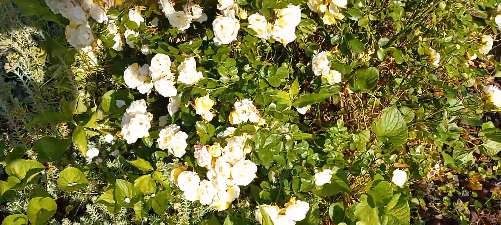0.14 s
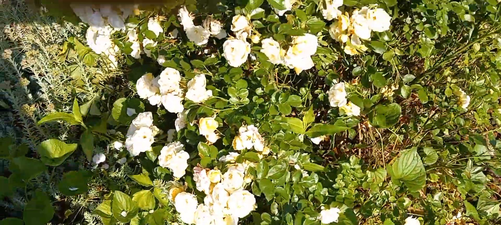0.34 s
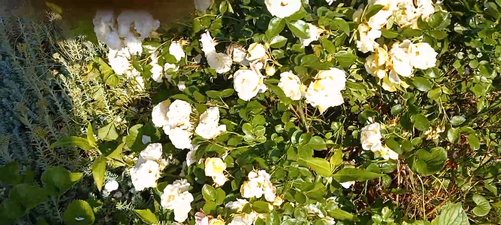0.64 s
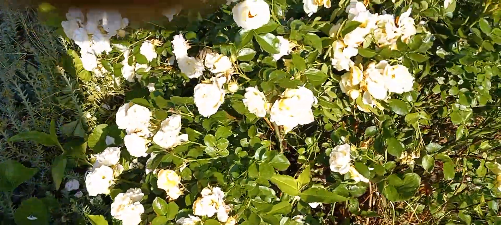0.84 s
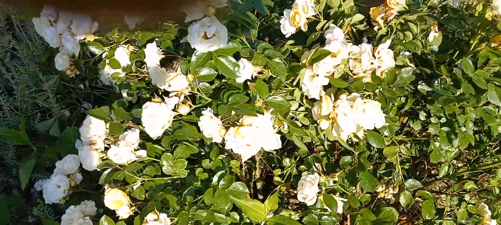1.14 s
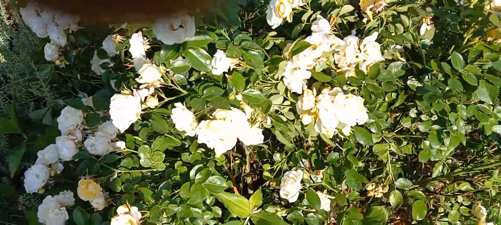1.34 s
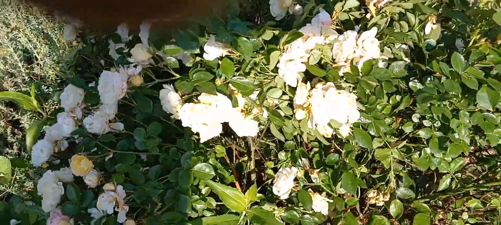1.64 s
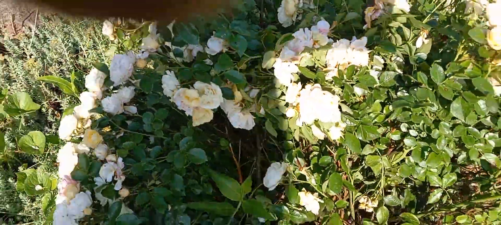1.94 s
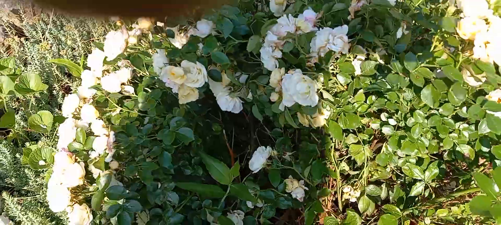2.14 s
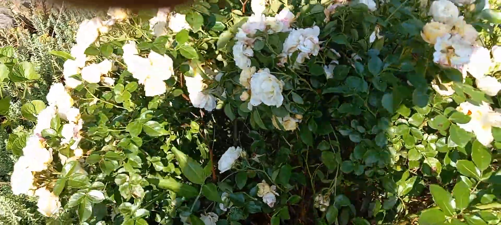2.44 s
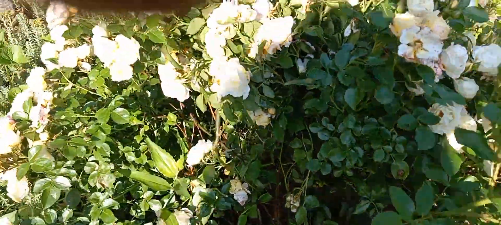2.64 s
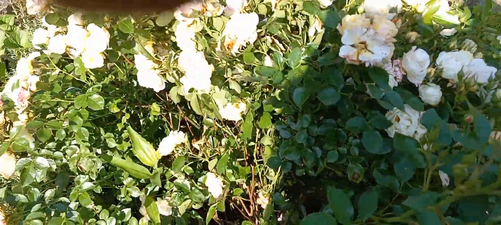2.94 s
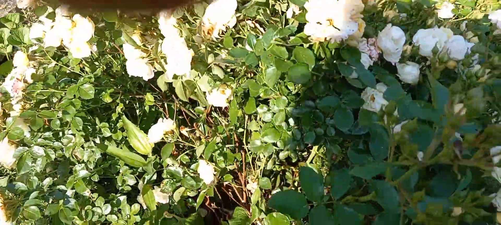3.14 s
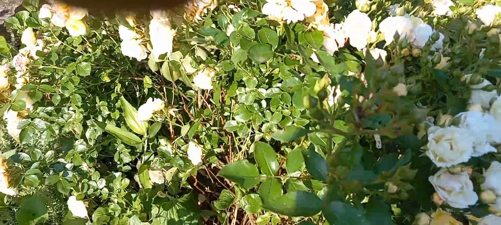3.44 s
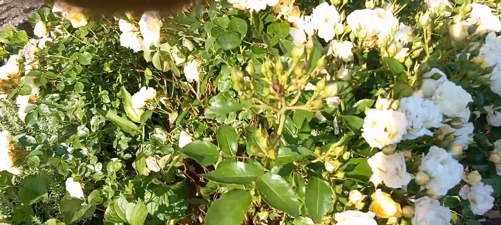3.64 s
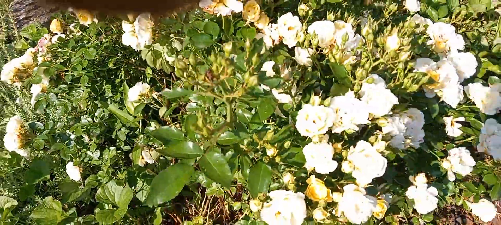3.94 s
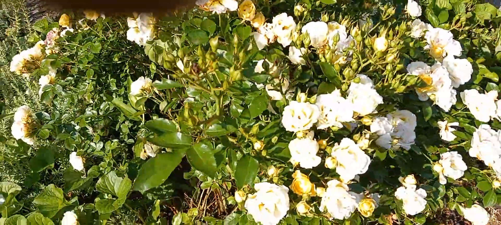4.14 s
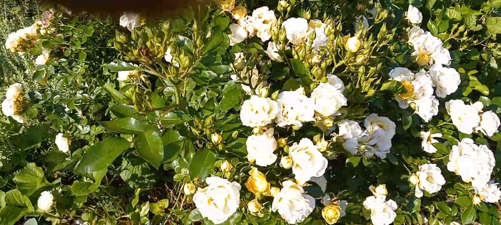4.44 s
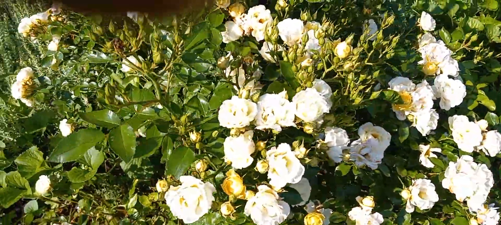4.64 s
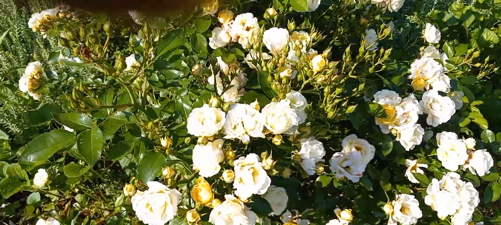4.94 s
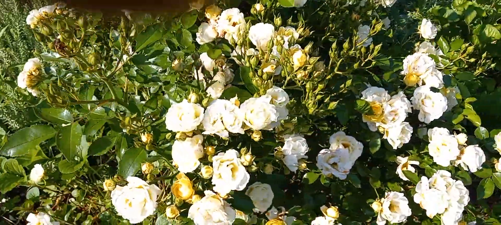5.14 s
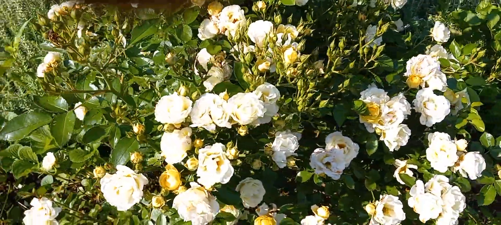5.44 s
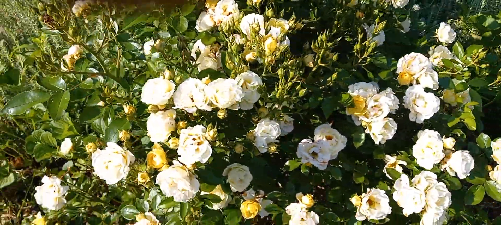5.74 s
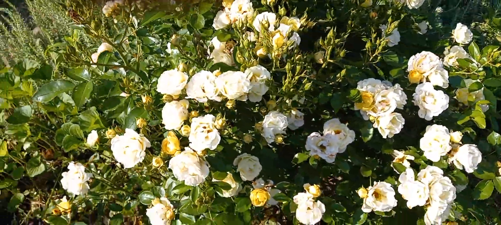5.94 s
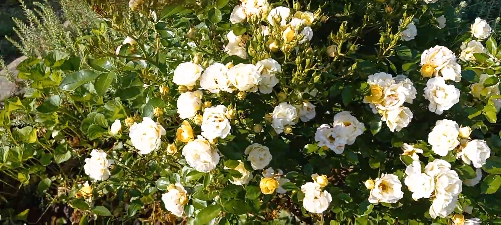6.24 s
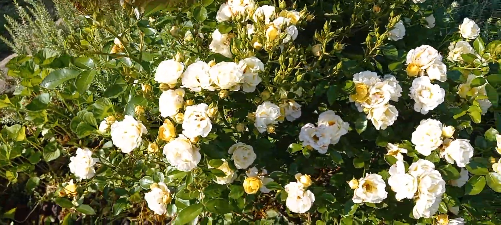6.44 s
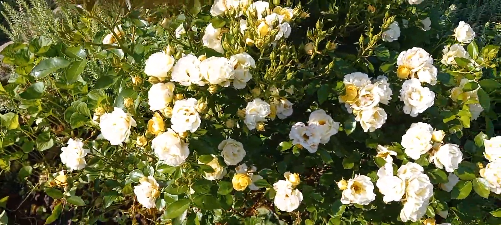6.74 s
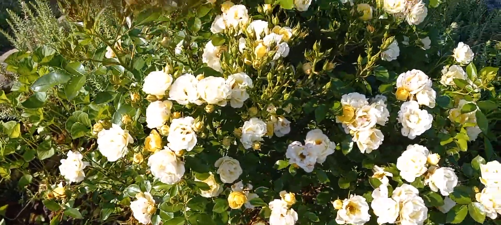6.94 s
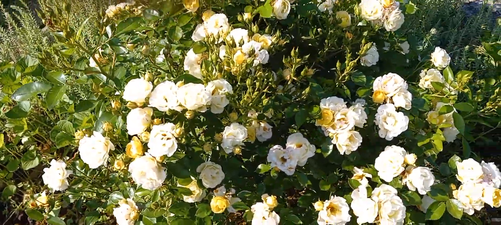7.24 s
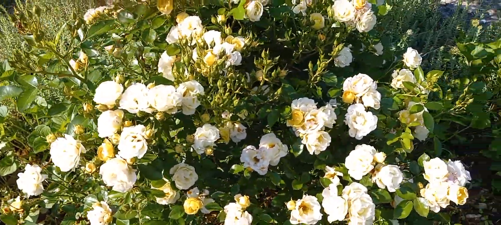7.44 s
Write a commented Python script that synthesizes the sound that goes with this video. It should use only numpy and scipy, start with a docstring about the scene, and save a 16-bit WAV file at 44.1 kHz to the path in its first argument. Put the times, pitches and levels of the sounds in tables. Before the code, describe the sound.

A quiet outdoor garden in stereo, with soft airy hush and a faint far machine, humming low with a light whirr, its direction shifting as the microphone turns. At once a bird whistles short pure notes near 2.2 and 2.5 kHz, low then rising high, twice by 0.6 s, with quick echoes off walls and leaves. Wind flutters low at the left, and foliage rustles crisply around 0.3 s. After a calmer gap, the phrase returns from 2.1 to 2.9 s, starting on the high note, amid rustles and wind puffs. Sharp twig ticks snap around 3.3 s. The heaviest wind thumps hit the left at about 4.5 s. The third phrase, clearer, runs from 4.9 to 5.65 s, with ticks and a snap near 5.36 s. Then mostly hum, hush, light wind and sparse rustle; handling clicks and a tiny high squeak come at 7.4 s.

```python
"""A garden, where a songbird whistles a phrase on two pitches, three times, with echoes off the walls nearby.
The whistles are gliding sine tones. Light wind, made of low noise, buffets each microphone port on its own.
A far machine hums and whirs, and swings round as the microphone turns: its delay between the ports changes.
Leaves and clothing rustle close by (showers of tiny clicks), twigs tick (bursts of dying noise),
a soft hush of filtered noise fills the air, and near the end there is a short squeak."""
import sys
import numpy as np
from scipy import signal
from scipy.fft import rfft, irfft, next_fast_len
from scipy.io import wavfile

SR = 44100
rng = np.random.default_rng(int(sys.argv[2]) if len(sys.argv) > 2 else 0)


def nominal_scale(level):
    """Amplitude ratio for a level in decibels (scalar or array-like)."""
    x = np.asarray(level, float) / 20
    return 10 ** x


def inscribe(sig):
    """Save sig as 16-bit PCM at rate SR to the path in sys.argv[1].

    A 1-D sig is mono; a 2-D sig holds one channel per row.
    Samples are clipped to [-1, 1] before scaling.
    """
    pcm = np.round(np.clip(np.atleast_2d(sig).T, -1, 1) * 32767)
    wavfile.write(sys.argv[1], SR, pcm.astype(np.int16))


N = 334719


def rms_one(x):
    """Scale to unit rms, so that a gain in dB then sets the average level."""
    return x / np.sqrt(np.mean(x ** 2) + 1e-20)


def in_time(rows):
    """Columns of a table as curves, joined by straight lines, sample by sample."""
    s, *columns = np.transpose(rows)
    return [np.interp(np.arange(N) / SR, s, column) for column in columns]


def band(x, low_hz, high_hz, order=2):
    """Keep the sound between two frequencies (Butterworth band-pass)."""
    edges_hz = [low_hz, min(high_hz, .45 * SR)]
    return signal.sosfilt(signal.butter(order, edges_hz, "band", fs=SR, output="sos"), x)


def drift(rate):
    """Slow random wander with spread 1; a higher rate in Hz makes it quicker."""
    r = np.exp(-80 * np.pi * rate / SR)   # smoothing, at one step per 40 samples
    slow = signal.lfilter([1], [1, -2 * r, r * r], rng.standard_normal(N // 40 + 2002))[2000:]
    return np.interp(np.arange(N) / 40, np.arange(len(slow)), rms_one(slow))


def panned(db):
    """Left and right gains for a level difference; a positive one makes the left louder."""
    return nominal_scale(np.array([db / 2, -db / 2]))


def wind():
    """Moving air presses on each port: a throb near 80 Hz; hard buffets reach higher."""
    # Buffets on a port. Each row: time in seconds, port (0 left, 1 right), height in dB, width in seconds.
    buffets = [(0.148, 0, -23.5, 0.034), (0.184, 0, -21, 0.018), (0.25, 0, -17.5, 0.018),
               (0.302, 0, -20, 0.018), (0.417, 1, -26, 0.012), (0.434, 0, -20.5, 0.028),
               (0.463, 1, -29, 0.035), (1.01, 0, -22, 0.059), (1.308, 0, -23, 0.028),
               (2.31, 1, -21.5, 0.027), (2.361, 1, -16.5, 0.023), (2.379, 0, -25, 0.047),
               (2.431, 1, -24.5, 0.043), (2.444, 0, -17, 0.071), (2.551, 0, -18.5, 0.039),
               (2.617, 0, -21.5, 0.02), (2.871, 0, -18, 0.03), (2.936, 1, -20, 0.025),
               (3.185, 1, -25, 0.014), (4.257, 1, -24, 0.016), (4.355, 1, -21, 0.049),
               (4.403, 1, -19, 0.018), (4.449, 0, -23, 0.035), (4.487, 0, -11.5, 0.032),
               (4.505, 1, -22.5, 0.029), (4.528, 0, -6.5, 0.041), (4.577, 0, -7, 0.0076),
               (4.633, 0, -19, 0.085), (4.66, 1, -21.5, 0.031), (4.758, 1, -24, 0.017),
               (4.794, 0, -21.5, 0.14), (4.92, 1, -26.5, 0.032), (4.977, 0, -17.5, 0.034),
               (5.159, 1, -26, 0.039), (5.301, 1, -16.5, 0.016), (5.941, 1, -21.5, 0.014),
               (6.035, 1, -21, 0.032)]
    # Steady breeze. Each row: time in seconds, level in dB before a lift and gusts, left-right in dB.
    breeze_rows = [(0, -56.5, -11), (.3, -39.5, 10), (.7, -52.5, -4.5), (1.3, -47.5, 7), (1.55, -59, -7),
                   (1.75, -55, -6), (2.1, -59.5, -14.5), (2.5, -43, -0.5), (3.3, -53, -7.5),
                   (4.15, -53, -4.5), (4.4, -44.5, -17.5), (4.65, -42, 2.5), (5.1, -47.5, 1),
                   (6.1, -49, -10), (6.6, -47.5, 1.5), (6.95, -55.5, -6), (7.3, -48, -4.5),
                   (7.59, -42.5, 5)]
    breeze_lift_db = 5.5
    t, power = np.arange(N) / SR, np.zeros((2, N))
    for s, port, height_db, width in buffets:
        near = slice(max(0, int((s - .12) * SR)), int((s + 0.22) * SR))
        power[int(port > .5), near] += nominal_scale(2 * height_db) * np.exp(-5.5 * ((t[near] - s) / width) ** 2)
    lumps = np.sqrt(power)

    throb = band(rng.standard_normal((2, N)), 64.4, 98.8)
    # even out the noise's own ups and downs, so that the lumps shape the level
    envelope = np.abs(signal.hilbert(throb, next_fast_len(N))[:, :N])
    throb = band(throb / envelope, 42.6, 165)
    edge = rms_one(band(rng.standard_normal((2, N)), 114, 278, order=3))
    hard = nominal_scale(-13.5) * lumps ** 1.494 * edge   # the power above 1 favours the strong buffets

    breeze_db, pan_db = in_time(breeze_rows)
    gusts = nominal_scale(np.array([3.8 * drift(10.1), 2.63 * drift(28)]))
    breeze = rms_one(band(rng.standard_normal((2, N)), 42.0, 105.4))
    breeze = breeze * gusts * nominal_scale(breeze_db + breeze_lift_db) * panned(pan_db)
    return lumps * throb + hard + breeze


def machine():
    """A hum, a low drone and a fan-like whirr from one far point; the lag between ports gives its bearing."""
    # The machine as the microphone turns. Each row: time in seconds, lag of the left port in samples,
    # whirr pitch in Hz, whirr level in dB, drone level in dB; the levels also waver.
    machine_rows = [(0, 16.6, 1799, -55, -63.5), (.6, 23, 1804, -60.5, -60),
                    (1.2, 24.3, 1862, -68.5, -59.5), (1.31, 22, 1852, -56.5, -54),
                    (1.42, 24, 1844, -66, -60), (3.2, 19, 1816, -63.5, -55.5),
                    (4.4, 13.2, 1792, -69, -53.5), (5.2, 10, 1745, -62, -56),
                    (6.2, 6.1, 1750, -59.5, -55.5), (7.59, 8.7, 1741, -60.5, -56.5)]
    # Faint steady pitches. Each row: frequency in Hz, middle of its wavering peak level in dB.
    steady_lines = [(118, -56.5), (649, -78.5)]
    hum_hz, hum_ahead_db = 234.6, -51   # the level at no lag
    hum_loss_db = 0.58                  # per sample that the left lags
    lag, whirr_hz, whirr_db, drone_db = in_time(machine_rows)
    n = np.arange(N)

    hum_db = hum_ahead_db - hum_loss_db * lag + 2.56 * drift(7.1)
    hum_turn = 2 * np.pi * np.cumsum(hum_hz + 0.894 * drift(5.8)) / SR
    hum = np.sqrt(2) * nominal_scale(hum_db) * np.sin(hum_turn)
    drone = rms_one(band(rng.standard_normal(N), 261, 391)) * nominal_scale(drone_db + 1.0 * drift(4.1))

    # slow noise carried up to the whirr pitch
    sway = signal.sosfilt(signal.butter(2, 55, fs=SR, output="sos"), rng.standard_normal((2, N)))
    turn = 2 * np.pi * np.cumsum(whirr_hz) / SR
    whirr = rms_one(sway[0] * np.cos(turn) + sway[1] * np.sin(turn))
    whirr = whirr * nominal_scale(whirr_db + 2.14 * drift(5.8))

    rush = rms_one(band(rng.standard_normal(N), 565, 3120, order=3)) * nominal_scale(-63.0)
    lines = sum(nominal_scale(db + 5.8 * drift(10.5)) * np.sin(2 * np.pi * hz * n / SR) for hz, db in steady_lines)
    # a far roar dies away by 3.8 dB per second
    roar = rms_one(band(rng.standard_normal(N), 410, 650)) * nominal_scale(-59.0 - 3.8 * n / SR)
    mono = roar + hum + drone + whirr + rush + lines
    return np.array([np.interp(n - lag, n, mono), mono])


def air():
    """Diffuse garden hush: coloured noise, unrelated at the two ports, since it comes from all around."""
    # Tone colour of the garden air. Each row: frequency in Hz, relative level in dB per Hz.
    colour_rows = [(59, -55), (100, 6), (181, -29), (239, -51), (784, -14.5), (1550, -12), (1760, -3),
                   (2130, -11), (2580, -13), (2860, -32.5), (4770, -14.5), (5300, -17), (16000, -59)]
    # Faint bands that stand out of the air. Each row: centre in Hz, width in Hz,
    # middle of its wavering level in dB.
    air_bands = [(2530, 72, -69), (3365, 370, -68), (4010, 270, -69), (4784, 49, -72), (7040, 860, -71)]
    hush_db = -59.5   # wavers a little
    size = next_fast_len(N)
    hz = np.fft.rfftfreq(size, 1 / SR) + 1   # 1 Hz up, as zero has no logarithm
    colour_hz, colour_db = np.transpose(colour_rows)
    colour = nominal_scale(np.interp(np.log(hz), np.log(colour_hz), colour_db))
    hush = irfft(rfft(rng.standard_normal((2, N)), size) * colour)[:, :N]
    out = nominal_scale(hush_db + 1.0 * drift(2.3)) * rms_one(hush)
    for centre_hz, width, db in air_bands:
        narrow = band(rng.standard_normal((2, N)), centre_hz - width / 2, centre_hz + width / 2, order=1)
        out += nominal_scale(db + 1.78 * drift(11.3)) * rms_one(narrow)
    return out


def song():
    """List whistles and strong echoes: (s, length s, start Hz, glide Hz, end dB, swell dB, pan dB, mid dB)."""
    # Low whistles, and one strong echo (the row at 2.405). Each row: start in seconds, length in seconds,
    # pitch at the start in Hz, level at the end in dB, left-right in dB, swell from start to end in dB.
    low_rows = [(0.005, 0.092, 2203, -49, 0.5, 4), (0.381, 0.057, 2160, -56, 3, -2),
                (2.317, 0.082, 2230, -51, 3, 2), (2.405, 0.038, 2215, -52.5, 4, 0),
                (2.645, 0.077, 2220, -51, 2, 3.5), (5.118, .072, 2223, -52.5, 0, 3),
                (5.437, 0.11, 2200, -54.5, -1, 0.5)]
    # High whistles, gliding up, and one strong echo (the second row). Each row: start in seconds,
    # length in seconds, start pitch in Hz, rise in Hz, level at the end in dB, swell from start to end in dB,
    # left-right in dB, brief mid-note change in dB.
    high_rows = [(0.12, 0.097, 2480, 109, -50, 1.5, 4, 6.5), (.226, .094, 2530, 60, -56, 3, -1, -7),
                 (0.448, 0.11, 2457, 112, -53, -7.5, 1, -5), (2.113, 0.11, 2505, 177, -51.5, 8.5, 0, 2),
                 (2.435, 0.133, 2510, 130, -52, 0.5, 1, -16), (2.79, 0.086, 2500, 143, -51.5, 3.5, -5, -2),
                 (4.902, 0.097, 2520, 166, -47, 4.5, -5, 2), (5.224, 0.11, 2453, 217, -48, 3, -8, -12),
                 (5.547, 0.11, 2476, 126, -49, -3.5, -2, 3.5)]
    low_sag_hz = 40
    # a second voice slips down while the low whistle still sounds
    slip_after_s, slip_s, slip_hz, slip_fall_hz, slip_db = .066, 0.024, 2100, 210, -3
    low, slips = [], []
    for s, length, hz, db, pan, swell in low_rows:
        low.append((s, length, hz, -low_sag_hz, db, swell, pan, 0))
        if length > slip_after_s:
            slips.append((s + slip_after_s, slip_s, slip_hz, -slip_fall_hz, db + slip_db, 0, pan, 0))
    return list(high_rows) + low + slips


def bird():
    """Gliding near-sines; each ear gets its own echoes and a tail scattered by leaves."""
    # Echoes off the walls. Each row: shortest delay in seconds, level in dB against the direct sound.
    echoes = [(.017, -16), (.036, -14), (.104, -14)]
    # Bearing of the bird as the microphone turns. Each row: time in seconds, lag of the left in samples.
    bird_lag = [(0, -14.5), (3.0, -16), (4.9, 17)]
    scatter_db, scatter_t60_s = -4.5, 0.49   # the tail falls by 60 dB in this time
    hook_hz, hook_s = 220, .0045             # rising notes start with a quick drop into pitch
    mid_after_s, mid_s = .044, .011          # some rising notes dip or bulge briefly
    direct = np.zeros((2, N))
    wobble_hz = 8 * drift(40)                # the voice is not quite steady
    flutter = nominal_scale(1.3 * np.array([drift(30), drift(30)]))   # moving air makes the level waver
    for s, length, start_hz, glide_hz, level_db, swell_db, pan_db, mid_db in song():
        t = np.arange(int(length * SR)) / SR
        at = int(s * SR)
        here = slice(at, at + len(t))
        hz = start_hz + glide_hz * t / length + wobble_hz[here]
        if glide_hz > 0:
            hz = hz + hook_hz * np.exp(-t / hook_s)
        shape_db = level_db + swell_db * (t / length - 1)
        shape_db = shape_db + mid_db * np.exp(-((t - mid_after_s) / mid_s) ** 2)
        fades = np.minimum(1, np.minimum(t / 0.0075, (length - t) / 0.0036))
        tone = np.sqrt(2) * fades * nominal_scale(shape_db) * np.sin(2 * np.pi * np.cumsum(hz) / SR)
        direct[:, here] += np.outer(panned(pan_db), tone)
    direct[0] = np.interp(np.arange(N) - in_time(bird_lag)[0], np.arange(N), direct[0])

    t = np.arange(SR // 2) / SR
    paths = rng.standard_normal((2, len(t))) * nominal_scale(-60 * t / scatter_t60_s) * np.minimum(1, t / 0.025)
    paths *= nominal_scale(scatter_db) / np.sqrt(np.sum(paths ** 2, axis=1, keepdims=True))
    paths[:, 0] = 1   # the direct sound
    for delay, db in echoes:
        ear_delays = delay + rng.uniform(0, .002, 2)
        paths[[0, 1], (ear_delays * SR).astype(int)] += nominal_scale(db)
    return signal.fftconvolve(direct * flutter, paths, axes=1)[:, :N]


def grains(per_s, spread_db, shared):
    """Random clicks of uneven size, partly shared by both ports."""
    sizes = nominal_scale(spread_db * np.minimum(rng.exponential(1, (3, N)), 4)) * rng.choice([-1, 1], (3, N))
    clicks = sizes * (rng.random((3, N)) < per_s / SR)
    return clicks[:2] + shared * clicks[2]


def swells(rows, column):
    """Sum swells (s, width s, ..) in power; one column gives the height in dB."""
    rise_share = 0.48   # a rustle comes up faster than it dies
    t, power = np.arange(N) / SR, np.zeros(N)
    for row in rows:
        near = slice(max(0, int((row[0] - .3) * SR)), int((row[0] + .3) * SR))
        late = (t[near] - row[0]) / row[1]
        late = np.abs(np.where(late < 0, late / rise_share, late))
        power[near] += nominal_scale(2 * row[column]) * np.exp(-4.0 * late ** 1.75)
    return power


def rustle():
    """Fine grains make the hiss, sparser dull ones the crunch; far leaves leave a smooth sizzle below."""
    # Rustles close by. Each row: peak time in seconds, width in seconds, crisp height in dB,
    # dull crunch height in dB; both heights together set the hiss.
    rustles = [(.03, 0.12, -69, -57), (.325, 0.17, -50, -56.5), (.70, 0.13, -62, -55.5),
               (1.06, 0.14, -73, -63), (1.69, 0.04, -60, -53), (2.205, 0.083, -54.5, -58),
               (2.51, 0.16, -61, -56), (2.61, 0.12, -64, -52.5), (2.7, 0.048, -68, -58),
               (2.78, 0.58, -76, -61.5), (3.34, 0.089, -64, -51), (3.95, 0.027, -59, -57),
               (4.33, 0.27, -74, -56.5), (4.46, 0.1, -67, -49), (4.77, 0.25, -72, -57.5),
               (5.37, 0.051, -71, -51), (6.0, 0.26, -85, -60), (6.48, 0.13, -67, -55.5),
               (7.42, 0.056, -65, -54)]
    # Sizzle of leaves farther off. Each row: time in seconds, middle of its wavering level in dB.
    sizzle_rows = [(0, -79), (.55, -68), (.9, -74.5), (1.3, -76), (1.6, -80), (1.85, -73.5), (2.9, -73),
                   (3.25, -79), (3.9, -72.5), (4.6, -74.5), (5.2, -78.5), (6.0, -73), (6.9, -83.5),
                   (7.59, -84)]
    crisp_pan_db, hiss_pan_db = 7., -4   # the crispest rustle is nearer the left port
    crackles_per_s, crackle_db = 82, -81   # stray dry clicks
    crackle_follows = 0.85                 # share of the swing of crisp rustle and sizzle
    crisp_power, crunch_power = swells(rustles, column=2), swells(rustles, column=3)
    sizzle_db = in_time(sizzle_rows)[0]

    fine = grains(1400., 4.1, .15) * nominal_scale(3.5 * drift(25))   # ragged, in clumps
    crisp = rms_one(band(fine, 11500, 14200)) * panned(crisp_pan_db)[:, None]
    hiss = rms_one(band(fine, 3500, 7900)) * panned(hiss_pan_db)[:, None]
    hiss_gain = nominal_scale(-3.5) * (crisp_power * crunch_power) ** .25   # 3.5 dB below midway of the two heights
    near = np.sqrt(crisp_power) * crisp + hiss_gain * hiss
    crunch = np.sqrt(crunch_power) * rms_one(band(grains(260., 2.7, 0.55), 190, 2500))

    sizzle = rms_one(band(rng.standard_normal((2, N)), 10900, 15400)) * nominal_scale(sizzle_db + .8 * drift(6))
    busy = (crisp_power + nominal_scale(2 * sizzle_db)) ** (crackle_follows / 2)
    crackle = band(grains(crackles_per_s, 4.2, 0.25), 9700, 15000) * busy
    return near + rms_one(crackle) * nominal_scale(crackle_db) + sizzle + crunch


def ticks():
    """A few milliseconds of dying noise around each centre; low ones ring longer."""
    # Ticks and snaps. Each row: start in seconds, peak level in dB, centre frequency in Hz.
    tick_rows = [(.043, -31, 4200), (0.356, -38.5, 1510), (1.682, -45, 5060), (1.779, -41.5, 11120),
                 (2.523, -41, 700), (2.535, -42, 900), (2.61, -40, 1400), (2.689, -40, 798),
                 (2.707, -38, 786), (2.788, -42, 10000), (3.31, -29, 9100), (3.298, -38.5, 6000),
                 (3.337, -36, 4800), (3.43, -29.5, 3130), (3.777, -43.5, 898), (4.353, -45, 1400),
                 (4.457, -37, 1190), (4.48, -38, 1100), (4.481, -36, 5300), (4.808, -34.5, 4860),
                 (4.869, -34.5, 4840), (5.002, -44.5, 5240), (5.08, -39.5, 5460), (5.357, -39.5, 900),
                 (5.361, -29, 3450), (5.364, -38.5, 350), (5.384, -32, 3660), (5.385, -38.5, 800),
                 (5.415, -41, 1150), (6.021, -39, 1010), (7.388, -44, 1794), (7.409, -39, 3700),
                 (7.428, -38, 700), (7.438, -36, 675), (7.451, -32.5, 760)]
    crack_db = -12   # bright edge of the higher ticks
    out, t = np.zeros((2, N + 2000)), np.arange(900) / SR
    for (s, peak_db, hz), noise in zip(tick_rows, rng.standard_normal((len(tick_rows), 2, 900))):
        dying = np.exp(-t * hz / 1.6) + .1 * np.exp(-t / .005)
        # the left port's noise is added to both, so the ports partly agree
        snap = band((noise + 2.8 * noise[0]) * dying, hz / 1.8, hz * 1.435, order=3)
        if hz > 2500:
            crack = band(noise * np.exp(-t / 0.00098), 5500, 15500)
            snap = snap + nominal_scale(crack_db) * crack * np.abs(snap).max()
        at = int(s * SR)
        out[:, at:at + 900] += nominal_scale(peak_db) * snap / np.abs(snap).max()
    return out[:, :N]


def squeak():
    """A brief wavering tone as a hand shifts, rising a little and equal at both ports."""
    # One row: start in seconds, length in seconds, pitch halfway in Hz, peak level in dB.
    squeak_row = (7.42, .027, 3550, -55)
    rise_hz = 60
    s, length, middle_hz, db = squeak_row
    t = np.arange(N) / SR
    shape = np.exp(-4 * ((t - s - length / 2) / length) ** 2)
    hz = middle_hz + rise_hz * np.clip((t - s) / length - .5, -1, 1) + 40 * drift(30)
    return nominal_scale(db) * shape * np.sin(2 * np.pi * np.cumsum(hz) / SR)


def scene():
    """All sources added up at the two ports."""
    return wind() + machine() + air() + bird() + rustle() + ticks() + squeak()


def band_limit(x):
    """A steep low-pass at the top of the band."""
    return signal.sosfilt(signal.butter(12, 15950, fs=SR, output="sos"), x)


def record(dry):
    """The low cut of the microphone takes away the deepest rumble, below 48 Hz."""
    cut = signal.sosfilt(signal.butter(4, 48, "high", fs=SR, output="sos"), dry)
    return band_limit(cut)


dry = scene()
out = record(dry)
inscribe(out)
```